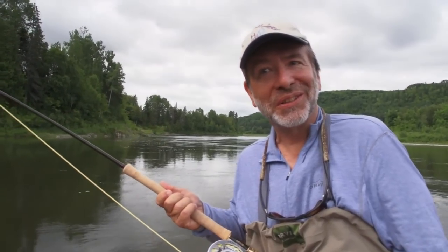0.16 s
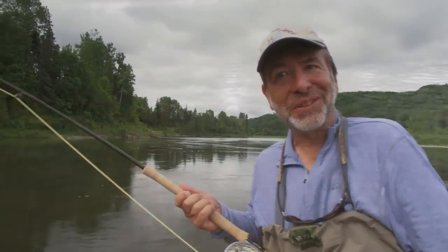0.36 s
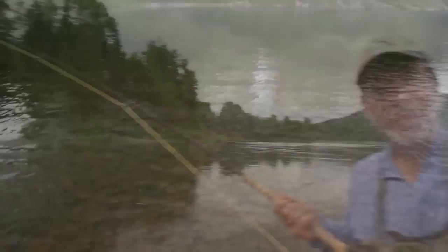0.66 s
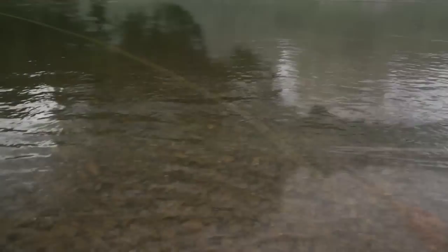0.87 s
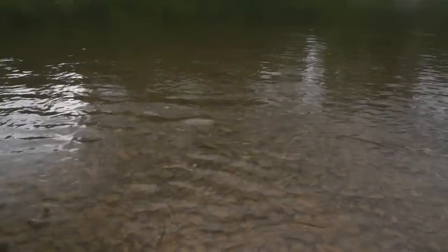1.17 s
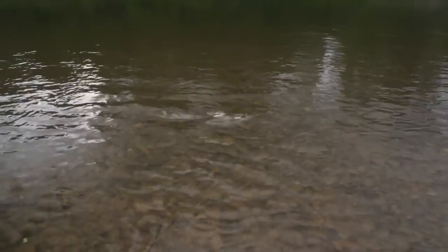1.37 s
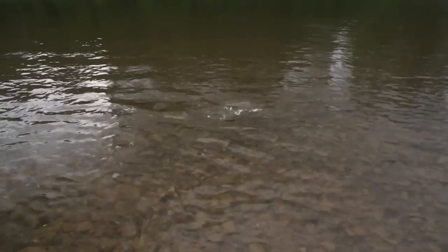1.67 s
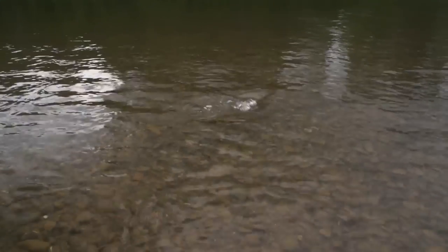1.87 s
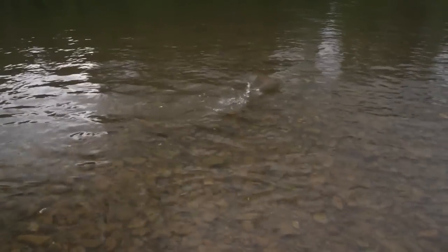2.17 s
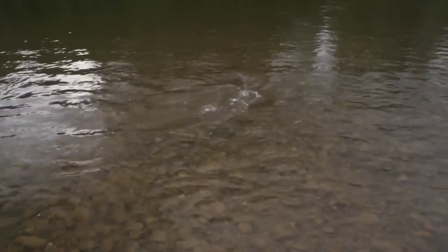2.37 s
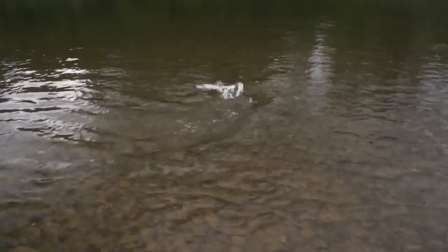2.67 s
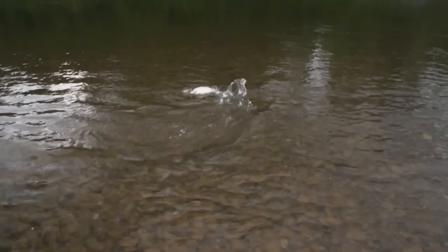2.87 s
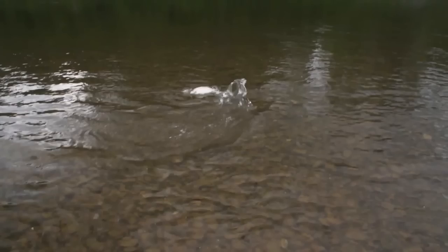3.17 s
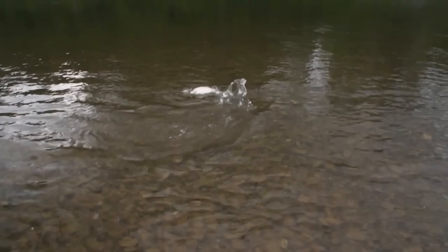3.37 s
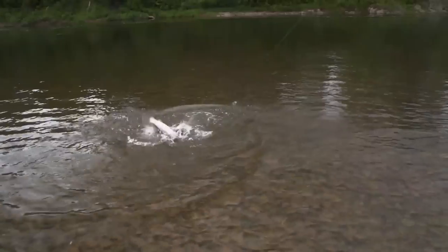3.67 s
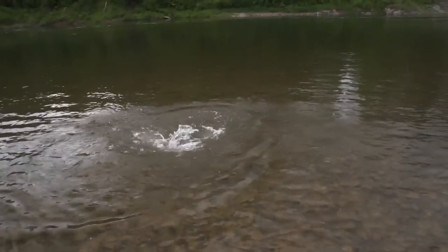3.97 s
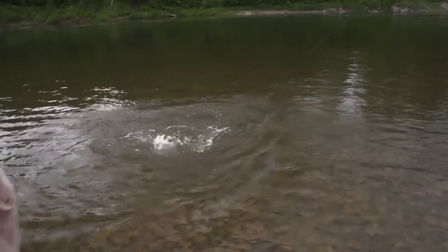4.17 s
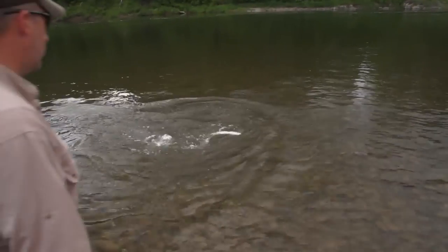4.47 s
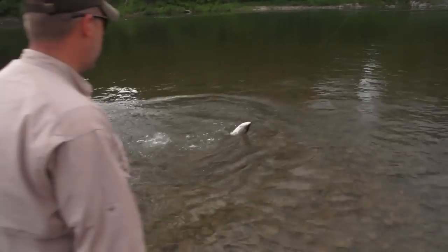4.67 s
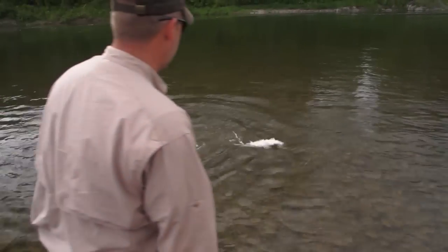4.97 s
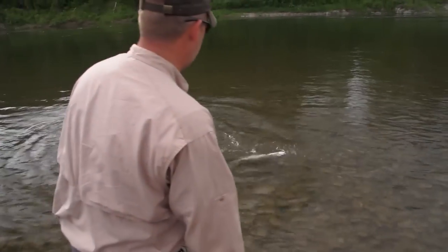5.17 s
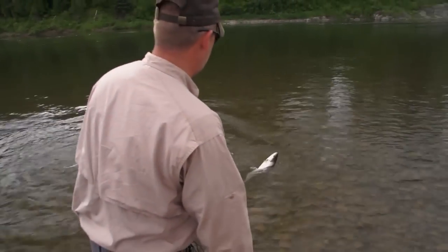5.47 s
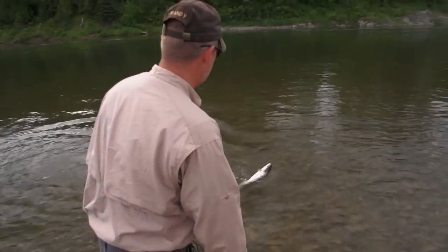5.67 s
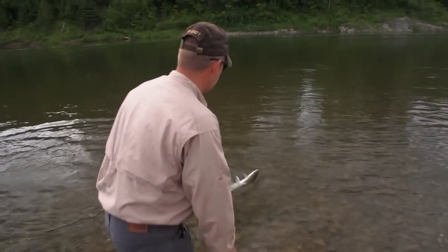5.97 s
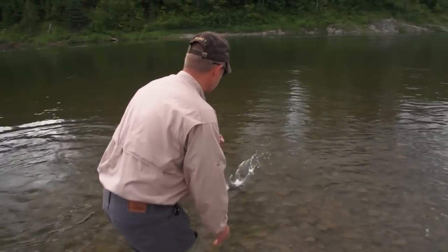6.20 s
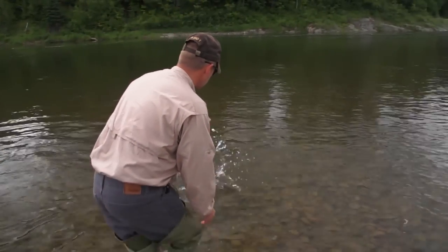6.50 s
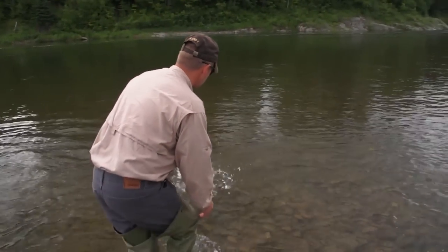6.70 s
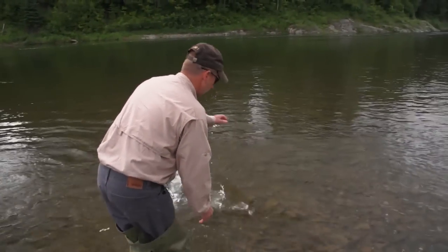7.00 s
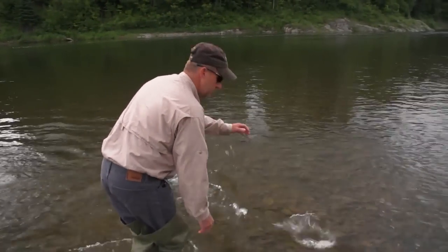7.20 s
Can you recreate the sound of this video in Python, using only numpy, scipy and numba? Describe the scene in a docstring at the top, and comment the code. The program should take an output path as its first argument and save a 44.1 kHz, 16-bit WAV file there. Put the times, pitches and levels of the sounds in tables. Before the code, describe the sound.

A quiet, steady boat motor hums with three tiny reel ticks, then stops abruptly. Trickling river water and small bubbly gulps follow, growing into irregular wet tail slaps and splashes. After a stronger burst the water settles into soft glugs and lapping. Late on, a fly reel buzzes in a rapid metallic ratchet among sharp slaps, and heavy close gurgling ends it. Outdoors, open and nearly dry, picked up fairly close.

```python
"""A hooked fish thrashes at the surface of a calm river, closer and closer to the angler.
Its tail slaps are bursts of noise; the trapped air gulps and bubbles as fading tones that rise or glide.
Spray is a cloud of tiny bubbles, and its drops patter back as ticks with small rings.
The fly reel ticks; later its ratchet buzzes over a narrow band of noise as the fish takes line.
A boat motor hums for the first moment, made of steady tones and noise, over a low river murmur."""
import sys
import numpy as np
from scipy import signal
from scipy.fft import rfft, irfft, next_fast_len
from scipy.io import wavfile
from numba import njit

SR = 44100
rng = np.random.default_rng(int(sys.argv[2]) if len(sys.argv) > 2 else 0)


def output_pcm(signal):
    """Save a mono or channel-first signal as 16-bit PCM at the path in sys.argv[1].

    Samples are clipped to [-1, 1] before scaling.
    """
    pcm = np.clip(np.atleast_2d(signal).T, -1, 1) * 32767
    wavfile.write(sys.argv[1], SR, np.round(pcm).astype(np.int16))


N = 323898
T = np.arange(N) / SR   # time of every sample, in seconds

# All levels are relative: the functions may add a gain on top.
# Tone colour of bubbling water: pitch_hz, level_db (per Hz)
WATER_SPECTRUM = [(120, -37), (170, -18.5), (260, -8.5), (450, -3), (600, -2), (850, -3), (1200, -9.5),
                  (1550, -14), (2150, -11.5), (2900, -20), (5500, -21.5), (9000, -22.5), (12500, -25),
                  (16000, -36)]
# Large single bubbles: start_s, level_db, pitch_hz
GULPS = [(0.693, -29.5, 515), (0.718, -35, 1750), (0.879, -34, 594), (0.925, -35.5, 1750),
         (1.02, -30.5, 820), (1.089, -34.5, 1750), (1.143, -32, 590), (1.465, -30, 570), (1.535, -27, 750),
         (1.654, -30, 523), (1.608, -27.5, 2190), (1.686, -30.5, 440), (1.777, -33.5, 2230),
         (2.022, -20.5, 451), (2.236, -29, 800), (2.395, -27, 440), (2.609, -26, 960), (2.702, -27, 770),
         (2.776, -25, 363), (2.817, -24, 1370), (2.884, -18, 426), (3.266, -18.5, 670), (3.424, -23, 567),
         (3.448, -22.5, 610), (3.468, -26, 650), (3.488, -22, 641), (4.022, -25, 805), (4.142, -21.5, 428),
         (4.227, -22, 324), (4.406, -32, 580), (4.769, -28.5, 663), (4.948, -28.5, 880), (5.214, -29, 2240),
         (5.386, -27, 684), (5.562, -28.5, 575), (5.768, -28.5, 590), (6.289, -21.5, 1073),
         (6.435, -25.5, 510), (6.44, -22.5, 2210), (6.614, -19.5, 2490), (6.826, -18.5, 646),
         (6.905, -16.5, 482), (6.933, -16, 275), (6.994, -14.5, 574), (7.027, -11, 434),
         (7.055, -14.5, 452), (7.102, -19.5, 592), (7.243, -22, 750)]
# Slaps and flicks of the tail: start_s, level_db, spray_against_body_db, fade_by_60_db_s
TAIL_SLAPS = [(1.022, -37, -20, 0.019), (1.427, -19.5, -15, .02), (1.609, -24, 2, .02),
              (1.971, -29, -11, 0.064), (2.818, -23, -19, 0.019), (2.880, -16.5, -16, 0.11),
              (2.97, -23, -3, 0.058), (3.053, -21.5, 7, 0.062), (3.229, -14, -15, 0.067),
              (3.299, -20, -11, 0.089), (3.7623, -13, 4.5, .03), (5.213, -28.5, -7, 0.046),
              (6.333, -14, -10, 0.042), (6.437, -20.5, -6, 0.045), (6.61, -14, 5, 0.019),
              (6.976, -16, -22, 0.056), (7.102, -24, -16, 0.02)]
# Deep air pockets closing behind the tail: start_s, level_db, pitch_hz
AIR_POCKETS = [(1.404, -32.5, 203), (1.63, -40, 130), (2.650, -33, 264), (2.902, -32.5, 184),
               (3.233, -30.5, 178), (3.274, -33.5, 141), (4.203, -37.5, 219), (6.934, -40, 245),
               (6.978, -21.5, 184)]
# Largest drops landing: start_s, level_db, pitch_hz
LARGE_DROPS = [(0.648, -35, 4660), (0.827, -31, 13900), (1.4471, -29, 5700), (1.6836, -27, 6600),
               (2.5964, -26, 8300), (2.677, -27, 4930), (2.779, -28, 4900), (3.1148, -29, 12100),
               (3.8806, -25.5, 5500), (4.0701, -29, 7100), (4.264, -26, 8840), (4.306, -28.5, 6660),
               (4.3525, -30.5, 8700), (4.4597, -32.5, 9300), (5.1772, -25.5, 10100), (5.249, -27, 10900),
               (5.5957, -26, 7700), (5.87, -27, 3790), (7.0846, -22, 5700), (7.1392, -20.5, 5100)]
# Drawn-out glugs of air: start_s, level_db, length_s, first_pitch_hz, last_pitch_hz
GLUGS = [(4.051, -31, 0.031, 405, 920), (4.266, -32, 0.038, 294, 486), (4.423, -37, 0.054, 550, 730),
         (4.52, -37.5, 0.074, 420, 310), (4.729, -34, 0.04, 330, 416), (4.813, -43, .04, 520, 860),
         (4.975, -36, 0.033, 375, 284), (5.051, -32.5, 0.045, 276, 457), (5.155, -32, .04, 520, 620),
         (5.29, -33.5, .035, 710, 660), (5.242, -35, 0.037, 328, 390), (5.323, -35, 0.042, 375, 285),
         (5.425, -36.5, .045, 312, 413), (5.579, -31, 0.052, 408, 500)]
# Surges of water as the fish beats and rolls:
# crest_s, length_s, gurgle_db, splash_db, spray_db, deep_bubbles_db
SURGES = [(0.709, 0.048, -43, -44.5, -44.5, -54), (0.8, 0.064, -67, -68, -47, -76),
          (1.273, 0.078, -38.5, -46, -45.5, -53), (1.443, 0.11, -38, -43, -44.5, -49),
          (1.538, 0.034, -41, -37, -41, -63), (1.679, .045, -38, -47, -47, -48.5),
          (1.888, 0.052, -39, -62, -55, -55), (2.024, 0.032, -37.5, -41, -44, -56),
          (2.273, 0.067, -39.5, -44.5, -53, -50), (2.394, 0.096, -36.5, -38.5, -38, -49.5),
          (2.52, 0.1, -37.5, -37.5, -36.5, -48.5), (2.604, .025, -40, -40, -46, -51),
          (2.736, 0.019, -38, -40, -41, -43.5), (2.854, 0.018, -35.5, -40, -38, -44),
          (2.89, .022, -28.5, -32.5, -40, -40), (3.073, 0.03, -57, -41, -48, -68),
          (3.178, 0.14, -49, -44, -47, -66), (3.315, 0.034, -30, -41, -46, -43.5),
          (3.465, 0.053, -34, -46.5, -44, -49), (3.655, 0.17, -48, -47.5, -46.5, -61),
          (3.794, 0.071, -50, -50, -47, -65), (3.921, 0.013, -49, -35, -43.5, -62),
          (4.139, 0.046, -39, -42, -43, -53), (4.221, 0.046, -36.5, -39.5, -46.5, -45),
          (4.544, 0.035, -38, -45, -44, -70), (4.768, 0.051, -46, -45, -45.5, -58),
          (4.98, .03, -41, -50, -57, -60), (5.176, 0.054, -44.5, -52, -47.5, -57),
          (5.31, 0.11, -43, -48.5, -48, -60), (5.567, 0.13, -42, -45, -49, -70),
          (5.76, .07, -42.5, -50, -51.5, -66), (5.988, 0.14, -42.5, -56, -51.5, -57.5),
          (6.337, 0.12, -39.5, -42, -39, -68), (6.448, 0.054, -38, -38, -49, -65),
          (6.622, 0.016, -32.5, -49, -54, -62), (6.836, 0.048, -31.5, -40.5, -32.5, -60),
          (6.914, .04, -26.5, -34, -34.5, -45), (7.003, 0.044, -24.5, -32, -34, -31.5),
          (7.091, 0.026, -27, -54, -43, -42), (7.172, 0.047, -38, -37, -38.5, -51),
          (7.288, 0.032, -33.5, -43, -49.5, -61)]
# Lapping and trickling between the surges: time_s, level_db
LAPPING = [(0.6, -48), (1.1, -47.5), (1.9, -49), (2.2, -43.5), (2.6, -41.5), (3.0, -46), (4.35, -49.5),
           (5.0, -45.5), (6.1, -45), (6.5, -40.5), (6.75, -37.5), (7.3, -43.5)]
# Treble lift of the spray: time_s, lift_db
SPRAY_TREBLE = [(0.8, -0.5), (1.1, -4), (2.0, -2), (2.35, -6.5), (2.7, 0), (4.3, 2.5), (4.8, -1.5),
                (5.7, -2.5), (6.3, 0.5), (7.3, 3.5)]
# Ringing tones of the reel: pitch_hz, level_db, fade_by_60_db_s
REEL_MODES = [(4100, -27, 0.0034), (5100, -6.5, 0.0039), (6600, -2, 0.0016), (8900, -8.5, 0.0036),
              (9970, -3.5, 0.0063), (10860, -8.5, 0.0056), (12600, -8, 0.0096), (13900, -15, .01),
              (15100, -26, .005)]
# Single ticks of the slowly turned reel: start_s, level_db
REEL_TICKS = [(0.0124, -27.5), (0.0404, -25), (0.0817, -26)]
# Speed of the reel as the fish takes line: time_s, teeth_per_s
REEL_RUN = [(6.0114, 29), (6.045, 64), (6.085, 82), (6.14, 67), (6.19, 61), (6.27, 45), (6.305, 72),
            (6.42, 78), (6.48, 52), (6.66, 64), (6.81, 23)]
# Narrow band of noise under the ratchet: time_s, level_db
RATCHET_NOISE = [(6.0, -71), (6.04, -46), (6.2, -49.5), (6.32, -50), (6.44, -40), (6.5, -57), (6.7, -50),
                 (6.81, -73)]
# Steady tones of the motor: pitch_hz, level_db
MOTOR_TONES = [(75.4, -57), (156.1, -78), (253.0, -54.5), (269.2, -51.5), (312.2, -62), (349.9, -76),
               (506.0, -46.5), (672.9, -61), (721.4, -73), (974.4, -63), (1050, -66), (1195, -74),
               (1523, -64), (2024, -60), (2568, -66), (2945, -76)]
# Tone colour of the motor's exhaust: pitch_hz, level_db (per Hz)
EXHAUST_SPECTRUM = [(35, -46), (60, -18), (262, -12.5), (437, -12), (600, -12), (1010, -15), (1780, -23),
                    (2300, -27), (3270, -33), (8000, -36.5), (16000, -47.5)]
# Rough gear whine of the motor: pitch_hz, width_hz, level_db
GEAR_WHINE = [(1013, 76, -56), (2000, 90, -57), (2514, 75, -61), (3010, 82, -67)]
# Loudness of the whole motor: time_s, level_db
MOTOR_LEVEL = [(0, -0.5), (0.33, -0.5), (0.605, 0), (0.64, -23), (0.72, -68)]

# how slowly a surge dies away, in lengths of the surge
GURGLE_FADE, SPLASH_FADE, SPRAY_FADE, DEEP_FADE = 1.28, 1.04, 1.14, 1.25
LAP_SPLASH_DB, LAP_SPRAY_DB, LAP_DEEP_DB = -3, -4.5, -19.5   # against the lapping's gurgle
# small drops thrown by a surge: longest flight, level against its spray, pitch range
FLIGHT_S, THROWN_DB, THROWN_SPREAD_DB, THROWN_LOW_HZ, THROWN_HIGH_HZ = .22, 8, 3, 4100, 9040
TOOTH_DB, TOOTH_SPREAD_DB, TOOTH_JITTER_S = -24, 0.8, 0.00033
BOUNCE_S, BOUNCE_DB = .007, -14   # delay and level of the pawl's bounce, against the tooth


def from_db(db):
    """Turn decibels into a gain."""
    return 10 ** (np.asarray(db) / 20)


def rms_one(x):
    """Scale a sound to an average strength (rms) of 1."""
    return x / np.sqrt(np.mean(x ** 2) + 1e-20)


def in_time(rows):
    """Read each column of a time curve at every sample."""
    s, *columns = np.transpose(rows)
    return [np.interp(T, s, column) for column in columns]


def at_hz(points, hz):
    """Read a spectrum at any pitch, with pitch on a log scale."""
    f, db = np.transpose(points)
    return np.interp(np.log(np.maximum(hz, 1)), np.log(f), db)


def band(x, low_hz, high_hz, order=2):
    """Keep only the part of a sound between two pitches."""
    edges = [low_hz, min(high_hz, .45 * SR)]
    return signal.sosfilt(signal.butter(order, edges, "band", fs=SR, output="sos"), x + 1e-18)


def noise(spectrum):
    """Make noise with the given spectrum, rms 1."""
    size = next_fast_len(N)
    white = rfft(rng.standard_normal(size))
    hz = np.arange(len(white)) * SR / size
    return rms_one(irfft(white * from_db(at_hz(spectrum, hz)), size)[:N])


def drift(hz):
    """Wander by chance, no faster than about hz, rms 1."""
    smooth = signal.butter(2, hz, fs=SR, output="sos")
    return rms_one(signal.sosfilt(smooth, rng.standard_normal(N)))


def add(out, s, sound):
    """Mix a short sound in at time s."""
    i = max(int(s * SR), 0)
    out[i:i + len(sound)] += sound[:max(N - i, 0)]


@njit
def bubbles(born, size, hz, t60, rise, swell):
    """Each bubble swells for some cycles, dies away and rises in pitch as it nears the surface."""
    out = np.zeros(N)
    for k in range(len(born)):
        start = max(int(born[k] * SR), 0)
        for i in range(min(int(t60[k] * SR), N - start)):
            age = i / SR / t60[k]   # 0 at birth, 1 when 60 dB down
            turns = i / SR * hz[k]
            height = size[k] * np.exp(-np.log(1000) * age) * (1 - np.exp(-turns / swell))
            out[start + i] += height * np.sin(2 * np.pi * turns * (1 + rise[k] * (age / 2 - .15)))
    return out


def river(level_db):
    """The river murmurs as steady noise shaped by a fixed spectrum."""
    murmur = [(25, -31), (50, -15), (78, -9), (120, -4.0), (400, -11), (2000, -3), (16000, -51)]
    return from_db(level_db) * noise(murmur)


def motor(tone_db, noise_db, waver, waver_hz):
    """Engine tones waver together, with a rough gear whine over exhaust noise."""
    turn = 2 * np.pi * np.cumsum(1 + waver * drift(waver_hz)) / SR
    sound = from_db(noise_db) * band(noise(EXHAUST_SPECTRUM), 65, SR, order=4)
    for hz, db in MOTOR_TONES:
        sound += np.sqrt(2) * from_db(db + tone_db) * np.sin(hz * turn + 2 * np.pi * rng.random())
    for hz, width, db in GEAR_WHINE:
        whine = band(rng.standard_normal(N), hz - width / 2, hz + width / 2)
        sound += from_db(db) * rms_one(whine)
    return sound * from_db(in_time(MOTOR_LEVEL)[0])


def teeth():
    """List start_s, level_db: the pawl drops and bounces once for each tooth that passes in the run."""
    running = (T >= REEL_RUN[0][0]) * (T < REEL_RUN[-1][0])
    passed = np.cumsum(in_time(REEL_RUN)[0] * running) / SR
    s = T[1:][np.diff(np.ceil(passed)) > 0]
    late, hard = rng.standard_normal((len(s), 2)).T
    falls = np.transpose([s + TOOTH_JITTER_S * late, TOOTH_DB + TOOTH_SPREAD_DB * hard])
    return np.vstack([falls, falls + [BOUNCE_S, BOUNCE_DB]])


def reel(click_db, scatter_db, slow_tilt_db, detune):
    """Each tooth kicks the pawl, which rings a little differently every time."""
    s, db = np.vstack([REEL_TICKS, teeth()]).T
    out, age = np.zeros(N), np.arange(SR // 50) / SR
    hz, mode_db, t60 = np.transpose(REEL_MODES)[:, :, None]
    sway = 0.025 * drift(7)   # the ring wanders slowly in pitch
    chance = rng.standard_normal((len(s), 2, len(REEL_MODES), 1))
    for at, level_db, (strength, shift) in zip(s, db, chance):
        # a slowly turned reel ticks duller
        soft = slow_tilt_db * np.log2(hz / 8000) * (at < RATCHET_NOISE[0][0])
        height = from_db(level_db + click_db + mode_db + soft + scatter_db * strength)
        pitch = hz * (1 + detune * shift + sway[int(at * SR)])
        rings = np.exp(-np.log(1000) * age / t60) * np.sin(2 * np.pi * pitch * age)
        add(out, at, np.sum(height * rings, axis=0))
    return band(out, 4700, SR)


def ratchet_noise(low_hz, high_hz):
    """A narrow band of noise near 2.7 kHz lies under the ratchet, following its own level curve."""
    sounding = (T > RATCHET_NOISE[0][0]) * (T < RATCHET_NOISE[-1][0])
    narrow = rms_one(band(rng.standard_normal(N), low_hz, high_hz, order=3))
    return narrow * from_db(in_time(RATCHET_NOISE)[0]) * sounding


def thrown_drops(count=2):
    """List start_s, level_db, pitch_hz of the small drops that fall back after each surge."""
    crest, _, _, _, spray_db, _ = np.repeat(SURGES, count, axis=0).T
    flight, size, pitch = rng.random((len(crest), 3)).T
    level_db = spray_db + THROWN_DB + THROWN_SPREAD_DB * (2 * size - 1)
    hz = THROWN_LOW_HZ * (THROWN_HIGH_HZ / THROWN_LOW_HZ) ** pitch
    return np.transpose([crest + FLIGHT_S * flight, level_db, hz])


def drops(ping_db, tick_db, cycles, tick_s):
    """A drop lands with a sharp tick and leaves a tiny ringing bubble."""
    s, db, hz = np.vstack([LARGE_DROPS, thrown_drops()]).T
    ticks, age = np.zeros(N), np.arange(SR // 100) / SR
    for at, level_db in zip(s, db):
        tick = rng.standard_normal(len(age)) * np.exp(-age / tick_s)
        add(ticks, at, from_db(level_db + tick_db) * tick)
    pings = bubbles(s, from_db(db + ping_db), hz, cycles / hz, np.full(len(s), .1), 0.63)
    return band(ticks, 3800, 12700, order=1) + pings


def pockets(gain_db, t60, rise):
    """A collapsing air pocket gives a short low thump."""
    s, db, hz = np.transpose(AIR_POCKETS)
    each = np.ones(len(s))
    thumps = bubbles(s, from_db(db + gain_db), hz, t60 * each, rise * each, 0.72)
    return band(thumps, 130, 790, order=5)


def glugs(gain_db, wobble):
    """An air hollow changes size as it rings, so its pitch glides while it swells and fades."""
    out = np.zeros(N)
    for s, db, length, first_hz, last_hz in GLUGS:
        along = np.linspace(0, 1, max(int(length * SR), 100))
        unsteady = 1 + wobble * np.interp(along, np.linspace(0, 1, 8), rng.standard_normal(8))
        hz = first_hz * (last_hz / first_hz) ** along * unsteady
        tone = np.sin(2 * np.pi * np.cumsum(hz) / SR)
        add(out, s, from_db(db + gain_db) * np.sin(np.pi * along) ** 2 * tone)
    return out


def gulps(gain_db, ring_s, rise, swell, train_db, train_s, count=5):
    """A large bubble rings and sheds a short train of smaller ones."""
    s, db, hz = np.transpose(GULPS)
    t60 = ring_s * np.sqrt(500 / hz)   # ring_s holds at 500 Hz; higher bubbles ring shorter
    rising = np.full(len(s), rise)
    out = bubbles(s, from_db(db + gain_db), hz, t60, rising, swell)
    for k in range(count):
        late, pitch = rng.random((len(s), 2)).T
        ratio = 2 ** (1.7 * (k + pitch) / count - .3)   # pitch against the large bubble
        size = from_db(db + train_db) / np.sqrt(ratio)
        out += bubbles(s + train_s * late, size, hz * ratio, 0.71 * t60 / ratio, rising, 0.1)
    return band(out, 236, 8500, order=3)


def stirred(levels_db, fade, lap_db):
    """Level in dB of one bubble size: surges swell to a crest and die away, over the lapping."""
    power = from_db(in_time(LAPPING)[0] + lap_db) ** 2
    for (crest, length, *_), db in zip(SURGES, levels_db):
        first, last = crest - 3 * length, crest + 6 * fade * length
        near = slice(max(int(first * SR), 0), int(last * SR))
        age = (T[near] - crest) / length
        shape = np.exp(-np.where(age < 0, age ** 2, age / fade))
        power[near] += (from_db(db) * shape) ** 2
    return 10 * np.log10(power)


def cloud(level_db, low_hz, high_hz, per_s, cycles, spread_db, rise, wash_db):
    """Many bubbles of one size range, over the wash of those too small to hear singly."""
    count = int(per_s * N / SR)
    when, pitch, life, big, sign, glide = rng.random((count, 6)).T
    born = (np.arange(count) + 2 * when) / per_s
    hz = low_hz * (high_hz / low_hz) ** pitch
    t60 = cycles / hz * 2 ** (2 * life - 1)
    # small bubbles are brief and spread over more hertz, so they need more height for the same density
    size_db = at_hz(WATER_SPECTRUM, hz) + spread_db * np.minimum(-np.log(big), 4.5)
    size = from_db(size_db) * hz * np.sign(sign - .5)
    # bring the whole cloud to about rms 1 before its level is applied
    size /= np.sqrt(np.sum(size ** 2 * t60) / (4 * np.log(1000)) * SR / N)
    # the harder the water is stirred, the more the single bubbles merge into a wash
    wash_share = from_db(wash_db + 0.14 * (level_db - np.median(level_db)))
    single = from_db(level_db) / np.hypot(1, wash_share)
    height = size * np.interp(born + t60 / 10, T, single)
    grains = bubbles(born, height, hz, t60, 2 * rise * glide, 0.47)
    wash = rms_one(band(noise(WATER_SPECTRUM), low_hz, high_hz, order=4)) * single * wash_share
    return band(grains, 0.72 * low_hz, SR, order=3) + wash


def churn():
    """Gurgling big bubbles, splashing middle ones and fizzing spray; deep strokes trap larger air."""
    _, _, gurgles, splashes, sprays, deeps = np.transpose(SURGES)
    gurgle_db = stirred(gurgles, GURGLE_FADE, 0) + 0.5
    deep_db = stirred(deeps, DEEP_FADE, LAP_DEEP_DB)
    clumps_db = 1.84 * drift(26)   # thrown water falls back in clumps
    splash_db = stirred(splashes, SPLASH_FADE, LAP_SPLASH_DB) - 1 + clumps_db
    spray_db = stirred(sprays, SPRAY_FADE, LAP_SPRAY_DB) - .5 + clumps_db
    deep = cloud(deep_db, 168, 299, per_s=86, cycles=10, spread_db=1.0, rise=0.093, wash_db=-2.5)
    gurgle = cloud(gurgle_db, 289.6, 1090, per_s=300, cycles=22.0, spread_db=1.58, rise=0.15, wash_db=-9.5)
    splash = cloud(splash_db, 1160, 2450, per_s=600, cycles=22.6, spread_db=4.5, rise=0.11, wash_db=-4)
    spray = cloud(spray_db, 2600, 17000, per_s=3200, cycles=23.0, spread_db=4.0, rise=.1, wash_db=-3)
    # tilt the spray: a lift raises its treble and lowers the rest
    coarse = signal.sosfilt(signal.butter(1, 6500, fs=SR, output="sos"), spray)
    lift = from_db(in_time(SPRAY_TREBLE)[0])
    spray = coarse / lift + (spray - coarse) * lift ** 1.95
    return (deep + gurgle + splash + spray) * np.interp(T, [.58, .63], [0, 1])


def slaps(gain_db, attack_s, grit_db):
    """The tail hits the surface: a hollow burst with a crackle of spray."""
    body = rms_one(band(noise(WATER_SPECTRUM), 380, 2600, order=3))
    crackle = rng.standard_normal(N) * from_db(grit_db * rng.standard_normal(N))
    spray = rms_one(band(crackle, 1700, 15000, order=1))
    out, age = np.zeros(N), np.arange(SR // 6) / SR
    for s, db, spray_db, t60 in TAIL_SLAPS:
        shape = (1 - np.exp(-age / attack_s)) * from_db(-60 * age / t60)
        i, wet = int(s * SR), from_db(spray_db)
        burst = (body[i:i + len(age)] + wet * spray[i:i + len(age)]) / np.hypot(1, wet)
        add(out, s, from_db(db + gain_db) * shape / shape.max() * burst)
    return out


def open_air(x, wet_db, t60):
    """Add a faint dull scatter off the boat and the rippled river: a short tail of fading noise."""
    age = np.arange(SR // 2) / SR
    tail = band(rng.standard_normal(len(age)), 210, 5200, order=1)
    tail *= from_db(-60 * age / t60) * (age > .004)
    return x + from_db(wet_db) * signal.fftconvolve(x, tail / np.linalg.norm(tail))[:N]


def scene():
    """Put the fish, the reel and the motor over the low murmur of the river."""
    gear = motor(tone_db=-0.5, noise_db=-43.5, waver=0.0021, waver_hz=11)
    gear += reel(click_db=-2.5, scatter_db=3.5, slow_tilt_db=-13.5, detune=0.02)
    gear += ratchet_noise(low_hz=2490, high_hz=2880)
    fish = drops(ping_db=1.0, tick_db=-5.5, cycles=36, tick_s=0.0028)
    fish += pockets(gain_db=6, t60=0.049, rise=0.23)
    fish += glugs(gain_db=-2.5, wobble=0.034)
    fish += gulps(gain_db=2.0, ring_s=0.048, rise=0.18, swell=0.58, train_db=-10, train_s=.012)
    fish += churn()
    fish += slaps(gain_db=-10.5, attack_s=0.0017, grit_db=10.0)
    return (river(level_db=-58.0) + gear + open_air(fish, wet_db=-22.0, t60=0.24))[None]


def record(dry):
    """The recorder cuts the deep bass below 60 Hz and the top above 16 kHz."""
    thin = signal.sosfilt(signal.butter(2, 60, "high", fs=SR, output="sos"), dry)
    return signal.sosfilt(signal.ellip(10, .2, 80, 16000, fs=SR, output="sos"), thin)


dry = scene()
out = record(dry)
output_pcm(out)
```